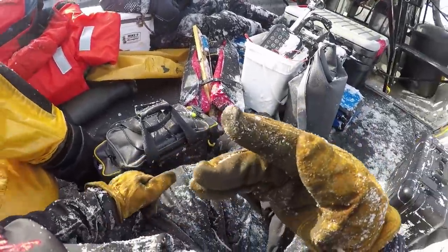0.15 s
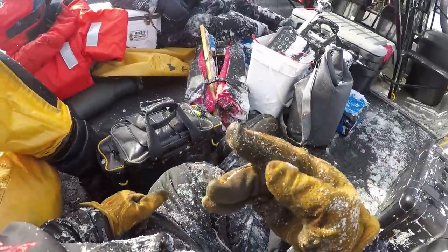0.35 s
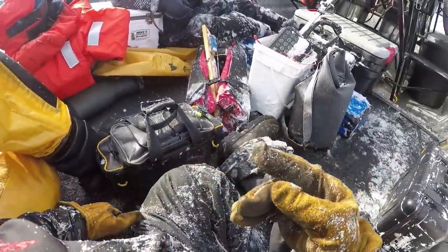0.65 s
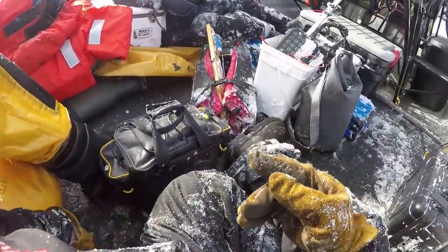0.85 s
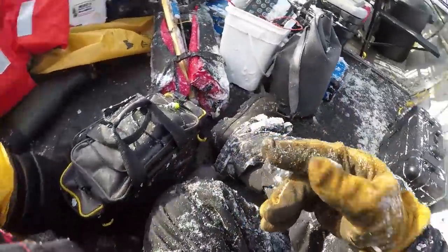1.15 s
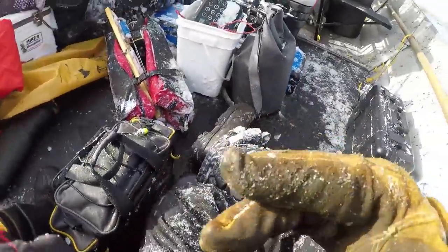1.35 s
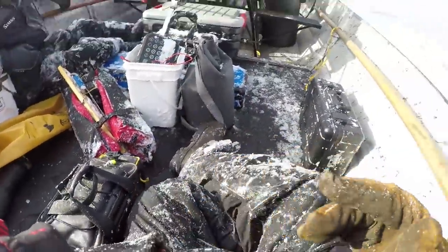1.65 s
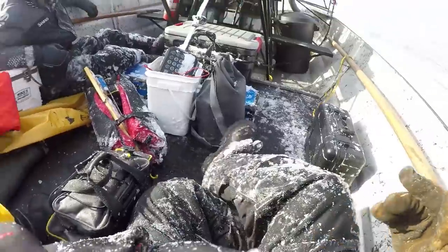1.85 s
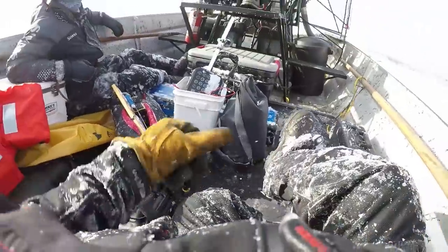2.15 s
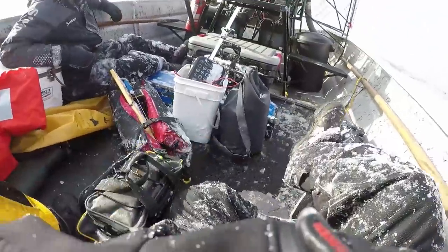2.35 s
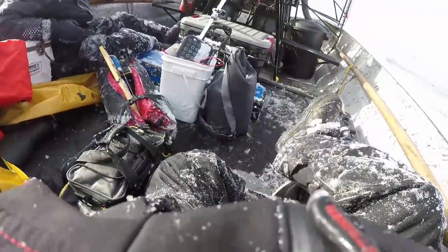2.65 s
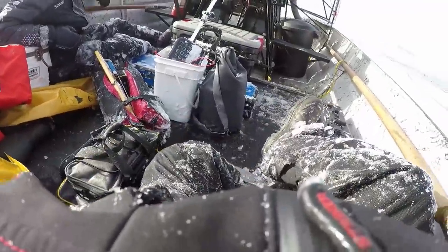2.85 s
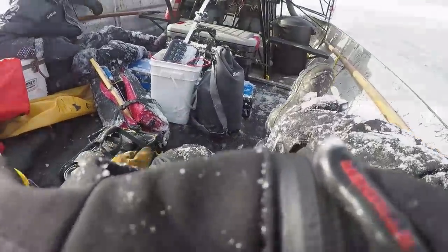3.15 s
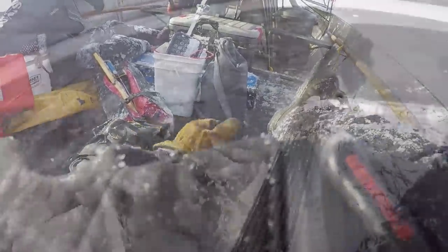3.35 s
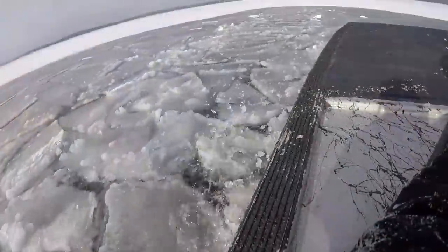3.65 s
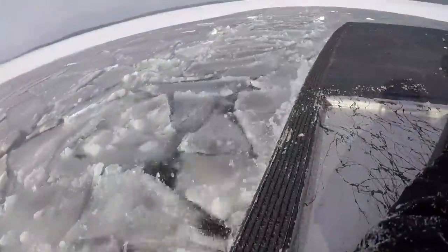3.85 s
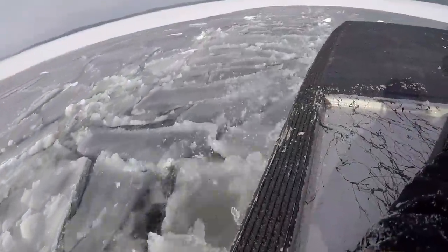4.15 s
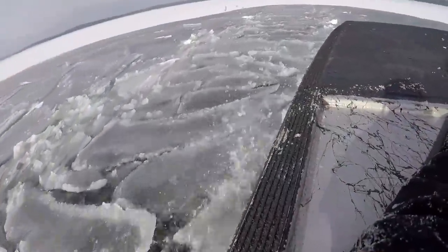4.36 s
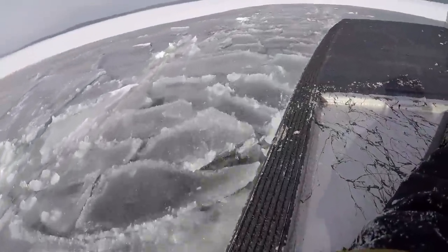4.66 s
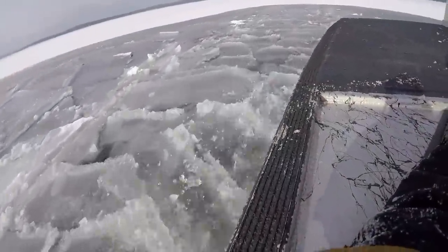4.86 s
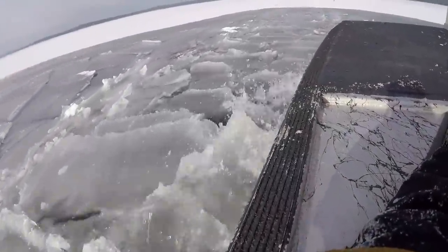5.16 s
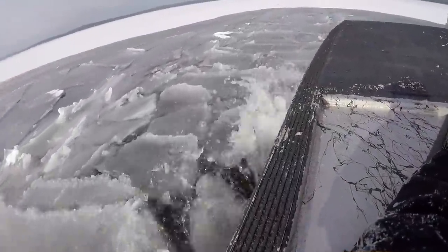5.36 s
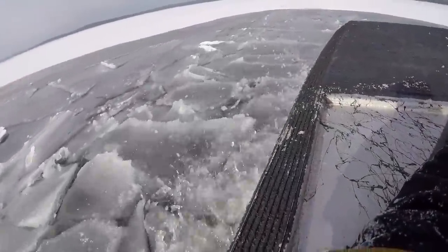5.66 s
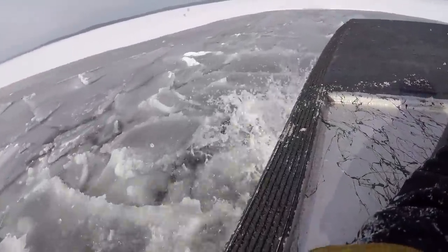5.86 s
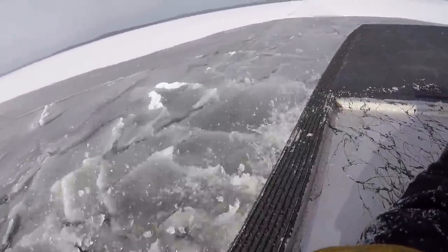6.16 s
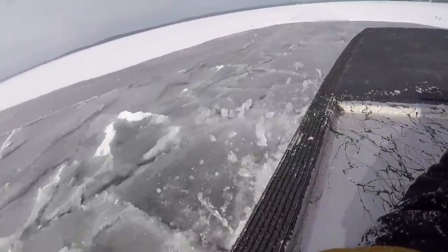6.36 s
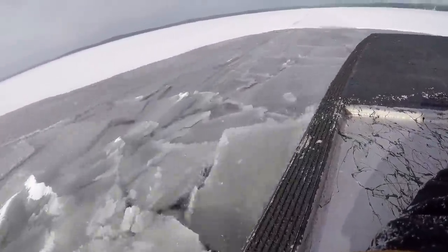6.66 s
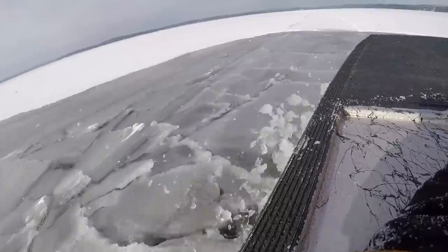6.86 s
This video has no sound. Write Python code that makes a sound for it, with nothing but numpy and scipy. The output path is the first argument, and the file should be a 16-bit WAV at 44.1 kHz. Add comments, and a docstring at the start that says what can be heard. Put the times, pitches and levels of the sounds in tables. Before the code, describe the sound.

Heard on board an airboat on a frozen lake through a muffled stereo microphone: a big engine and propeller roar, blipped three times with pitch gliding up and down, then drops back. It dissolves into a steady, lower pulsing drone as the hull runs through broken ice, with a cluster of short slab knocks near the change and fainter gritty ticks afterwards.

```python
"""On lake ice, an airboat is heard from on board through two muffled ports, left and right.
The engine is blipped three times and drops back; this dissolves into a steady cruise through broken ice,
heard from the gunwale. Engine and propeller are sines on the orders of the four-stroke cycle, over
shaped noise for roar and hiss that pulses with the shaft. Ice slabs are decaying sines with noise grit."""
import sys
import numpy as np
from scipy import signal
from scipy.fft import rfft, irfft, next_fast_len
from scipy.io import wavfile
from scipy.ndimage import uniform_filter1d, minimum_filter1d, map_coordinates

SR = 44100
rng = np.random.default_rng(int(sys.argv[2]) if len(sys.argv) > 2 else 0)


def gain_from_decibels(decibels):
    """Convert decibel values to linear amplitude factors."""
    exponent = np.asarray(decibels, float) / 20
    return 10 ** exponent


def output_pcm(signal):
    """Save a mono or channel-first signal as 16-bit PCM at the path in sys.argv[1].

    Samples are clipped to [-1, 1] before scaling.
    """
    pcm = np.clip(np.atleast_2d(signal).T, -1, 1) * 32767
    wavfile.write(sys.argv[1], SR, np.round(pcm).astype(np.int16))


N = 309141  # samples
STEP = 64  # samples between the points of slow controls


def curves(rows):
    """Linear interpolation in time: one value per sample for each column after the time."""
    s, *cols = np.transpose(rows)
    return [np.interp(np.arange(N) / SR, s, c) for c in cols]


def on_log(hz, f, v):
    """Spectral interpolation: values read on a log-frequency axis."""
    return np.interp(np.log(hz + 1), np.log(f + 1), v)


def wobble(rate):
    """Band-limited random modulation: a smooth slow control with rate knots a second."""
    knots = rng.standard_normal(N // STEP)
    return map_coordinates(knots, [np.arange(N // STEP + 2) * STEP * rate / SR])


def fine(slow):
    """Upsampling: a slow control becomes one value per sample."""
    return np.interp(np.arange(N), np.arange(len(slow)) * STEP, slow)


def filtered(x, response, ends="even"):
    """Linear filtering: the spectrum times a response; the ends are continued to avoid clicks."""
    edge = 4096  # samples
    padding = [(0, 0)] * (x.ndim - 1) + [(edge, edge)]
    x = np.pad(x, padding, "reflect", reflect_type=ends)
    m = next_fast_len(x.shape[-1] + edge)
    spectrum = rfft(x, m) * response(np.fft.rfftfreq(m, 1 / SR))
    return irfft(spectrum, m)[..., edge:edge + N]


def noise(patchy_db, channels):
    """Turbulence as random noise: flat, density 1 per Hz, with time-frequency patches of random gain."""
    z = signal.stft(rng.standard_normal((channels, N)), nperseg=512)[2]
    field = uniform_filter1d(rng.standard_normal(z.shape[1:]), size=5, axis=0)
    field = uniform_filter1d(field, size=10, axis=1)
    x = signal.istft(z * gain_from_decibels(patchy_db * field / field.std()), nperseg=512)[1][:, :N]
    return x / x.std() * np.sqrt(SR / 2)


def pulsing(cycles, depth_db, scatter_db, lag):
    """Amplitude modulation: a gain of rms 1 beats unevenly once and twice a shaft turn."""
    turn = 2 * np.pi * (2 * cycles - lag)  # two shaft turns per engine cycle
    beat = np.cos(turn) + 0.89 * np.cos(2 * turn + 0.6)
    gain = gain_from_decibels(depth_db * beat + scatter_db * fine(wobble(110)))
    return gain / np.sqrt(np.mean(gain ** 2))


def whine():
    """Narrow-band noise: a resonance curve at 1952 Hz leaves a faint, fuzzy metallic whine."""
    band = filtered(rng.standard_normal(N), lambda hz: 1 / (1 + ((hz - 1952) / 25) ** 2))
    return gain_from_decibels(-60) * band / band.std()


def hiss(cycles, rows, depth_db, lag, hiss_db, lower_db):
    """Incoherent sources: pulsing air noise, unrelated at the two ports, in a lower and an upper band."""
    frequency, *ports_db = np.transpose(rows)
    air = pulsing(cycles, depth_db, scatter_db=1.0, lag=lag) * noise(0.32, channels=2)
    colours = lambda hz: gain_from_decibels([on_log(hz, frequency, db) for db in ports_db])
    low_share = lambda hz: 1 / (1 + (hz / 5300) ** 12)
    upper = filtered(air, lambda hz: colours(hz) * (1 - low_share(hz)))
    lower = filtered(air, lambda hz: colours(hz) * low_share(hz))
    return gain_from_decibels(hiss_db) * upper + gain_from_decibels(lower_db) * lower


# slabs knocking under the hull: start_s, level_db (before onset and pitch weighting), pitch_hz, t60_s
SLABS = [(3.51, -25, 1200, 0.12), (3.833, -21, 3680, 0.04), (4.17, -26, 3500, 0.025),
         (4.207, -26, 3180, 0.03), (3.83, -8, 476, 0.074), (3.842, -10.5, 375, 0.096),
         (4.14, -12, 254, 0.1), (3.85, -13.5, 820, 0.05), (4.321, -11.5, 860, 0.03),
         (4.336, -14, 910, 0.052), (4.373, -19.5, 1500, 0.04), (4.378, -13.5, 1390, 0.035),
         (4.513, -23.5, 990, 0.048), (4.874, -26.5, 1150, 0.043), (5.385, -25.5, 1470, 0.076),
         (5.42, -26.5, 1690, 0.064), (5.617, -29, 980, 0.056), (5.78, -20.5, 990, 0.078),
         (6.082, -27.5, 1020, 0.055), (6.252, -28.5, 1066, 0.049), (6.47, -23, 985, 0.055),
         (6.52, -25.5, 1375, 0.1)]
# colour of the grit from the breaking edge, only its shape counts: frequency_hz, level_db
GRIT_COLOUR = [(300, -32), (700, 5), (1200, 1.5), (2200, -9.5), (4000, -27.5), (8000, -51)]


def ice():
    """Damped oscillation: each slab knocks roughly around its pitch; middling ones add a tick of grit."""
    grit_db, grit_t60 = -16, .05  # dB relative to the slab level; s
    t, knocks, grit_gain = np.arange(N) / SR, np.zeros(N), np.zeros(N)
    sway = np.cumsum(fine(wobble(300))) / SR  # crushing ice holds no clean pitch
    for start, db, hz, t60 in SLABS:
        age = np.maximum(t - start, 0)
        shape = gain_from_decibels(db - 60 * age / t60) * (1 - np.exp(-age / 0.0013))
        weight = 1.3 * min(800 / hz, 1) ** 1.5
        knocks += weight * shape * np.sin(2 * np.pi * hz * (age + .04 * sway))
        if 700 < hz < 3000:
            grit_gain += gain_from_decibels(db + grit_db - 60 * age / grit_t60) * (1 - np.exp(-age / 0.001))
    grit = filtered(rng.standard_normal(N), lambda hz: gain_from_decibels(on_log(hz, *np.transpose(GRIT_COLOUR))))
    return knocks + grit_gain * grit / grit.std()


def roar(cycles, rows, depth_db, lag, roar_db, rumble_db):
    """Spectral shaping: two pulsing noises in the right port's colour, rumble and roar set apart."""
    rumble_top = 660  # Hz
    f, right_db = np.transpose(rows)[:2]
    raw = pulsing(cycles, depth_db, scatter_db=1.36, lag=lag) * noise(0.96, channels=2)
    inside = lambda hz: (hz > f[0] / 2) * (hz < 1.1 * f[-1])
    whole = filtered(raw, lambda hz: gain_from_decibels(on_log(hz, f, right_db)) * inside(hz))
    rumble = filtered(whole, lambda hz: 1 / (1 + (hz / rumble_top) ** 8))
    return gain_from_decibels(rumble_db) * rumble + gain_from_decibels(roar_db) * (whole - rumble)


def left_port(right, own, rows):
    """Partial coherence: the left port hears a filtered copy of the right one plus a share of its own."""
    f, _, left_db, alike, lag = np.transpose(rows)
    port = lambda hz, v: on_log(np.maximum(hz, 100), f, v)  # below 100 Hz level and likeness hold
    phase = lambda hz: port(hz, lag) * np.minimum(hz / 100, 1)
    to_left = lambda hz: gain_from_decibels(port(hz, left_db)) * np.exp(-1j * phase(hz))
    like = lambda hz: np.clip(port(hz, alike), 0, 1)
    left = filtered(right, lambda hz: to_left(hz) * like(hz), ends="odd")
    return left + filtered(own, lambda hz: to_left(hz) * np.sqrt(1 - like(hz) ** 2))


def effort(speed, law):
    """Source scaling: levels in dB follow engine speed and load, which shows as gain or loss of speed."""
    usual_speed = 25  # engine cycles per s
    full_load, load_lag = 24, 0.044  # cycles per s per s at wide throttle; s by which the sound follows
    keep = np.exp(-1 / (load_lag * SR))
    load = signal.lfilter([1 - keep], [1, -keep], np.tanh(np.gradient(speed) * SR / full_load))
    doublings = np.log2(speed / usual_speed)
    return [db + per_doubling * doublings + per_load * load for db, per_doubling, per_load in law]


# multiples of the engine cycle, rms levels before colour and gains: order, blip_level_db, cruise_level_db
ORDER_LEVELS = [(1, -32.5, -40.5), (2, -10.5, -23), (3, -21.5, -30.5), (4, -27.5, -24.5), (5, -17.5, -14),
                (6, -22.5, -16), (7, -45, -30.5), (8, -23, -21.5), (9, -35.5, -35.5), (10, -23, -35),
                (11, -41, -30), (12, -32, -31), (13, -37, -34), (14, -31, -29.5), (15, -40.5, -33.5),
                (16, -34, -24.5), (17, -39, -48), (18, -34, -26.5), (19, -44, -40.5), (20, -34.5, -29.5),
                (21, -42, -37.5), (22, -34, -25.5), (23, -47, -42.5), (24, -31.5, -28.5), (25, -42, -34.5),
                (26, -24.5, -28.5), (27, -41, -33.5), (28, -28.5, -23), (29, -41.5, -33.5),
                (30, -38.5, -28.5), (31, -46.5, -38.5), (32, -31, -33.5), (33, -40, -41.5),
                (34, -35.5, -39), (35, -40.5, -46), (36, -32, -38.5), (37, -39.5, -39), (38, -27.5, -39),
                (39, -39.5, -51), (40, -34, -42)]


def orders(speed, cycles, column, colour, bright_db, firing_db, odd_db, drone_db, singer, singer_db,
           shut, pulse):
    """Harmonic series: sines on the cycle's multiples; low ones steady, higher ones flutter."""
    cylinders = 8
    overtone = 2 * cylinders  # twice the firing rate
    dispersion, offset, odd_offset, rough, drift = pulse
    slow = np.minimum(np.arange(N // STEP + 2) * STEP, N - 1)
    bright_db, firing_db, odd_db = bright_db[slow], firing_db[slow], odd_db[slow]
    drone_db, singer_db = drone_db[slow], singer_db[slow]
    start, end, drop_db = shut
    ramp = np.minimum(slow / SR - start, end - slow / SR) / .04  # 40 ms ramps
    shut_db = drop_db * np.clip(ramp, 0, 1)
    tone = 0
    for k, db in enumerate(np.transpose(ORDER_LEVELS)[column], start=1):
        db = db + on_log(k * speed[slow], *np.transpose(colour))
        db = db + bright_db * np.clip((k - 6) / 8, 0, 1)
        db = db + firing_db * (k == overtone) + odd_db * (k % 2)
        db = db + drone_db * (26 <= k <= 30) + singer_db * (k in singer)
        db = db + shut_db * (k >= 2 and abs(k - overtone - 1) > 1)
        size = np.sqrt(2) * gain_from_decibels(db)  # rms to peak
        loose = np.clip(rough * (k / 10) ** 1.5, 0, .45)
        along = size * (np.sqrt(1 - loose) + np.sqrt(loose / 2) * wobble(drift))
        across = size * np.sqrt(loose / 2) * wobble(drift)
        phase = 2 * np.pi * (k * cycles + dispersion * k ** 2 + offset + odd_offset * (k % 2))
        tone = tone + fine(along) * np.cos(phase) + fine(across) * np.sin(phase)
    return tone


def boat(speed_rows, law, lower_rows, column, colour, roar_rows, hiss_rows, crank, pulse, pulse_db,
         hiss_pulse_db, puff_lag, shut, extra, singer, swells=((0, 0, 0, 0),)):
    """Superposition: one crank angle drives the tones, roar and hiss that add up at the two ports."""
    speed = uniform_filter1d(curves(speed_rows)[0], size=SR // 25)  # the flywheel rounds the corners
    levels = effort(speed, law)
    tone_db, roar_db, hiss_db, bright_db, firing_db, odd_db, rumble_db, rundown_db = levels
    swell_db, drone_db, singer_db = curves(swells)
    cycles = np.cumsum(speed) / SR
    cycles = cycles - cycles[round(5.0 * SR)] + crank  # crank, in cycles, is the angle at 5 s
    tone = orders(speed, cycles, column, colour, bright_db, firing_db + swell_db, odd_db, drone_db,
                  singer, singer_db + rundown_db, shut, pulse)
    right, own = roar(cycles, roar_rows, pulse_db, puff_lag, roar_db, rumble_db)
    right = right + gain_from_decibels(tone_db) * tone + extra
    left = left_port(right, own, roar_rows)
    lower_db = hiss_db + curves(lower_rows)[0]
    air = hiss(cycles, hiss_rows, hiss_pulse_db, puff_lag - .06, hiss_db, lower_db)
    return np.array([left, right]) + air


# engine speed at cruise: time_s, speed_cycles_per_s
CRUISE_ENGINE = [(0, 17.75), (4.2, 17.76), (4.6, 17.72), (5.1, 17.585), (5.4, 17.58), (6.7, 17.56),
                 (7.01, 17.65)]
# how tone, roar, hiss, upper orders, firing overtone and odd orders follow the engine, a row each:
# usual_speed_db, per_doubling_db, full_load_db
CRUISE_EFFORT = [(-0.6, 0, 0), (0.3, 0, 0), (-0.4, 0.017, 0.0029), (0, 0.0058, 0.016), (0, 0.0082, 0.0019),
                 (0, 0.012, 0)]
# gain of the lower hiss over the upper: time_s, level_db
CRUISE_LOWER_HISS = [(0, 1.4)]
# roar before gains: frequency_hz, right_db_per_hz, left_minus_right_db, likeness_0_to_1, left_lag_rad
CRUISE_ROAR_PORTS = [(25, -58, -6.5, 1.0, -1.8), (45, -41, 1.8, 1.0, -0.56), (87, -42.5, -0.4, 1.0, 0),
                     (165, -44.5, -0.6, 1, -0.15), (275, -47.5, -1.5, 1, -0.05), (440, -47, -5.5, 1, -0.04),
                     (542, -45, -9.5, 1, 0), (690, -52, -17, 0.54, -2), (880, -57.5, -5.5, 0.68, -2.5),
                     (1250, -69.5, -2, 0.84, -2), (1620, -75, -1, 0.41, -2.5),
                     (2450, -87, -0.3, 0.091, 2.5), (3450, -86.5, -1, 0.91, -0.8),
                     (5440, -105.9, 11, 0.42, -1)]
# air hiss before gains: frequency_hz, left_db_per_hz, right_db_per_hz
CRUISE_HISS_PORTS = [(2980, -110, -120), (4130, -93.5, -99), (6160, -83.5, -100.9), (7300, -85.5, -108.1),
                     (9360, -100.1, -116.9), (12000, -108.7, -127.0), (15000, -127.6, -132.9),
                     (16000, -150, -150)]
# orders swell and sink: time_s, firing_overtone_db, orders_26_to_30_db (near 500 Hz), order_22_db (390 Hz)
CRUISE_SWELLS = [(3.7, 2.5, 3, 0), (4.1, -1.5, 4, -6), (4.7, 3.5, 0.5, 2.5), (4.95, -6.5, -2, -0.5),
                 (5.2, -8.5, 2.5, -1), (5.7, -2, 1, 0), (6.0, -0.5, 2.5, 2.5), (6.4, 3.5, -5.5, 1),
                 (7, 3, 1.5, 2)]


def cruise():
    """Quasi-stationary source: the engine at near-constant speed, with ice knocks and a faint whine."""
    # rumble and run-down rows, in the columns of the effort table
    law = CRUISE_EFFORT + [(-1.5, 0, 0), (0, 0, 0)]
    # cycles per order squared, offset cycles, extra odd offset cycles, loose share at order 10, changes per s
    pulse = (-.032, .47, .36, .045, 3)
    running = boat(CRUISE_ENGINE, law, CRUISE_LOWER_HISS, 2, [(100, 0)], CRUISE_ROAR_PORTS,
                   CRUISE_HISS_PORTS, crank=0.513, pulse=pulse, pulse_db=0.5, hiss_pulse_db=1.5,
                   puff_lag=0.88, shut=(0, 0, 0), extra=ice(), singer=(22,), swells=CRUISE_SWELLS)
    return running + whine()


# engine speed in the throttle blips: time_s, speed_cycles_per_s
BLIP_ENGINE = [(0.0, 25.1), (0.19, 28.0), (0.28, 28.8), (0.46, 26.95), (0.64, 23.9), (0.77, 23.0),
               (0.99, 22.3), (1.1, 22.7), (1.39, 28.55), (1.44, 28.3), (1.61, 24.6), (1.82, 22.9),
               (1.97, 24.3), (2.11, 27.4), (2.24, 29.55), (2.3, 28.7), (2.45, 23.6), (2.56, 21.3),
               (2.66, 19.75), (2.86, 19.8), (3.2, 20.3), (3.5, 20.45)]
# how tone, roar, hiss, upper orders, firing overtone and odd orders follow the engine, a row each:
# usual_speed_db, per_doubling_db, full_load_db
BLIP_EFFORT = [(-1.5, 4, 1.5), (1.5, 8.5, 2), (-0.5, 9, 2), (-0.5, 7, 0), (2.5, -5, 5), (-1.5, -3, 3)]
# gain of the lower hiss over the upper, which drops as the ports turn away: time_s, level_db
BLIP_LOWER_HISS = [(0, 8.5), (.5, 7), (1, 6.5), (1.4, 6), (1.6, 9.5), (1.7, 0), (2.1, -7), (2.3, 2),
                   (2.7, -16.5), (3.5, -9)]
# hull and seat colour that the gliding orders pass through: frequency_hz, gain_db
HULL_COLOUR = [(40, -5), (55, -1.5), (75, -4), (91, -2), (101, 6.5), (114, 3), (138, -3.5), (157, 4),
               (170, 6), (198, 4.5), (225, 4.5), (290, 3), (370, 4), (460, 9.5), (520, 4.5), (590, 7.5),
               (680, -5.5), (900, -23.5)]
# roar before gains: frequency_hz, right_db_per_hz, left_minus_right_db, likeness_0_to_1, left_lag_rad
BLIP_ROAR_PORTS = [(24.8, -53.5, -4, 0.93, 0.02), (45, -41.5, -0.2, 1.0, 0.03),
                   (92.5, -39.5, -1.5, 1.0, 0.037), (164, -45, -0.6, 1, 0.05), (304, -46.5, -2, 1.0, 0.23),
                   (501, -43.5, -6.5, 0.97, 0.42), (565, -42, -11.5, 1, 0.6), (690, -51, -17, 0.95, 0.64),
                   (863, -58, -17, 0.6, 1.4), (1240, -69, -7, 0.9, 0.53), (1730, -86.5, 10.5, 0.5, 1.5),
                   (1940, -85, 1.5, 0.9, 2.35), (3190, -88.5, -0.7, 1, 1.1), (5060, -104.0, 1.5, 0.7, 0.26)]
# air hiss before gains: frequency_hz, left_db_per_hz, right_db_per_hz
BLIP_HISS_PORTS = [(2860, -110, -120), (4150, -92.5, -99), (6640, -76, -105.8), (7400, -81, -106.4),
                   (9500, -91, -113.8), (12000, -103.0, -127.5), (15000, -128.4, -135.0),
                   (16000, -150, -150)]


def blips():
    """Swept source through fixed resonances: gliding orders take on the colour of hull and seat."""
    # the rumble thins out as the engine revs; the exhaust sings on two orders as it runs down
    law = BLIP_EFFORT + [(-1, -1, 0), (1, 0, -6)]
    # cycles per order squared, offset cycles, extra odd offset cycles, loose share at order 10, changes per s
    pulse = (.016, -.46, -.28, .045, 6)
    # shut throttle: the orders fall away, all but those at the firing overtone
    shut = (2.47, 3, -6)  # start s, end s, dB
    return boat(BLIP_ENGINE, law, BLIP_LOWER_HISS, 1, HULL_COLOUR, BLIP_ROAR_PORTS, BLIP_HISS_PORTS,
                crank=0.0967, pulse=pulse, pulse_db=1.0, hiss_pulse_db=1.25, puff_lag=0.013,
                shut=shut, extra=0, singer=(18, 20))


def dissolve():
    """Cross-fading: gains of the scene that fades out and of the one that fades in."""
    start, end = 2.59, 3.95  # s
    done = np.clip((np.arange(N) / SR - start) / (end - start), 0, 1)
    return np.abs(np.cos(done * np.pi / 2)) ** 0.95, done ** 1.27


def scene():
    """Linear mixing: the blips and the cruise overlap during the dissolve."""
    out, into = dissolve()
    return out * blips() + into * cruise()


def roll_off(x):
    """The treble ends steeply here."""
    return signal.sosfilt(signal.butter(12, 15650, fs=SR, output="sos"), x)


def record(dry):
    """Dynamic limiting: a look-ahead gain rides both ports down smoothly around the largest peaks."""
    needed = np.minimum(1, .94 / (np.abs(dry).max(axis=0) + 1e-9))
    held = minimum_filter1d(needed, size=661)  # 15 ms
    gain = uniform_filter1d(uniform_filter1d(held, size=331), size=331)
    return roll_off(dry * gain)


dry = scene()
out = record(dry)
output_pcm(out)
```